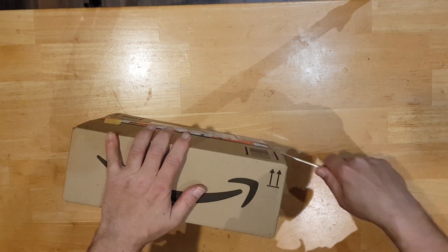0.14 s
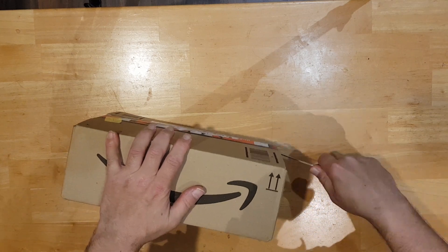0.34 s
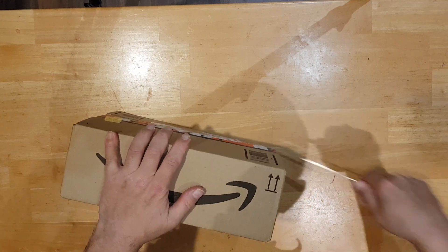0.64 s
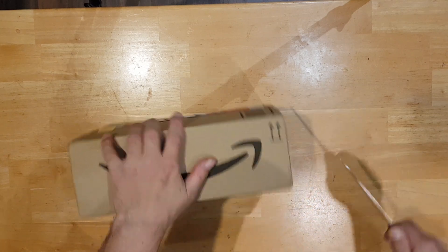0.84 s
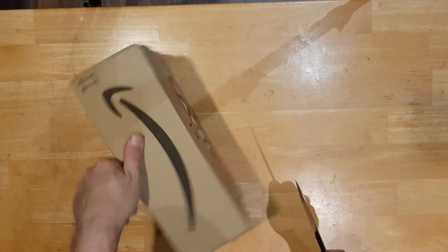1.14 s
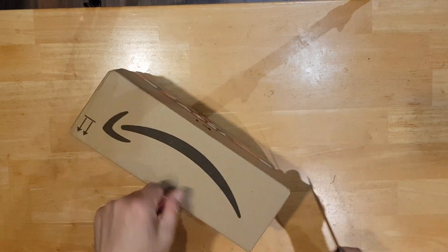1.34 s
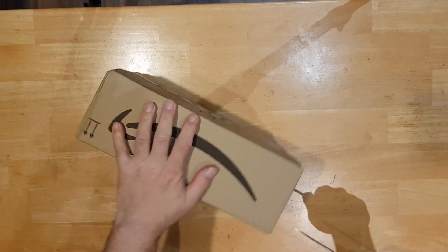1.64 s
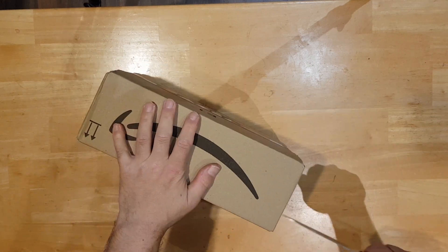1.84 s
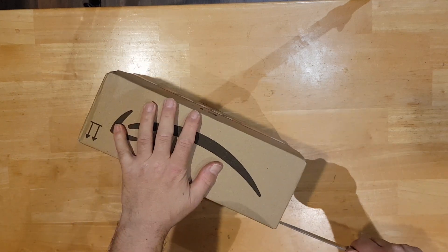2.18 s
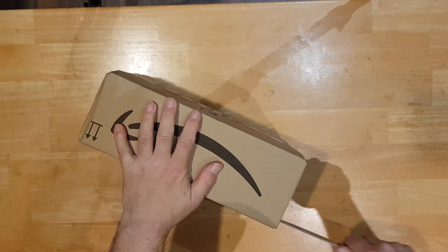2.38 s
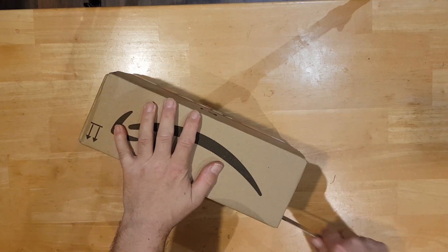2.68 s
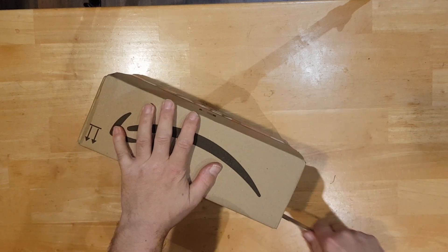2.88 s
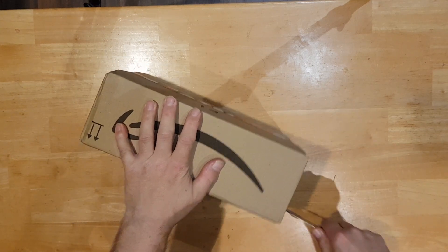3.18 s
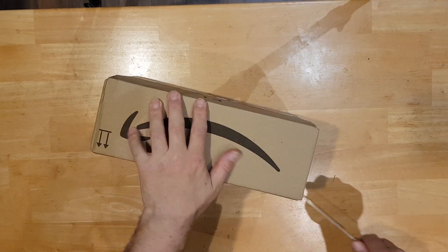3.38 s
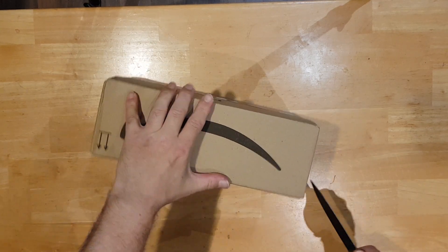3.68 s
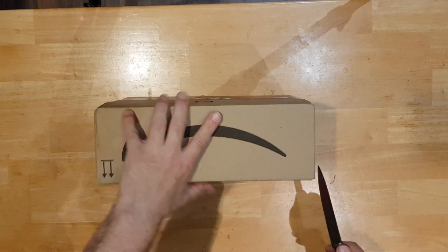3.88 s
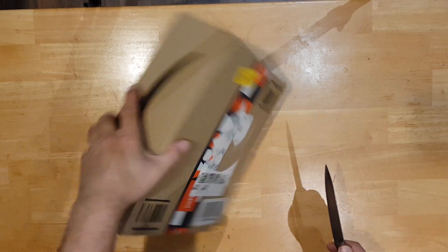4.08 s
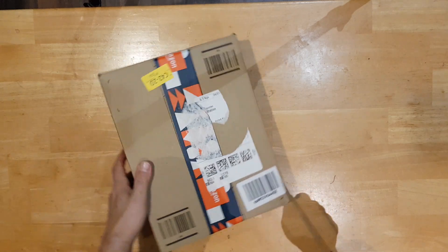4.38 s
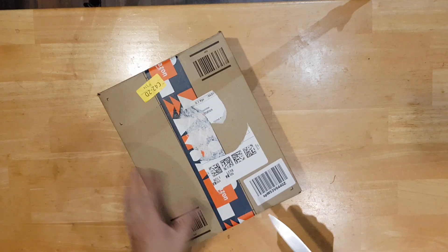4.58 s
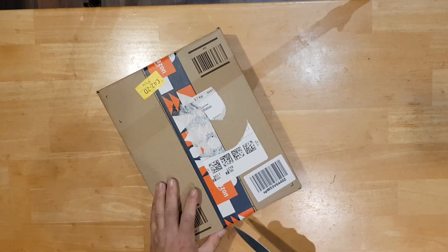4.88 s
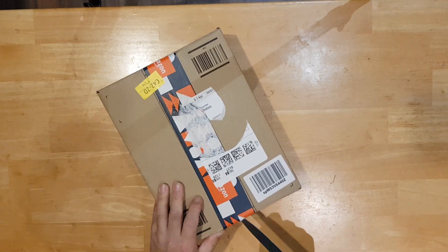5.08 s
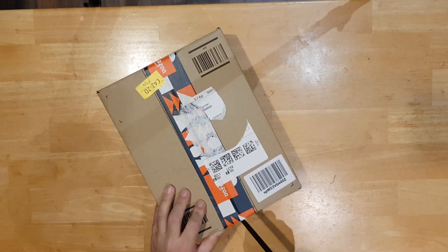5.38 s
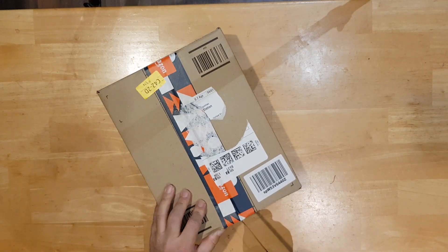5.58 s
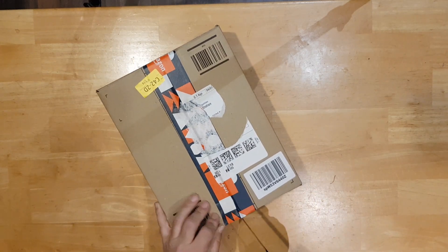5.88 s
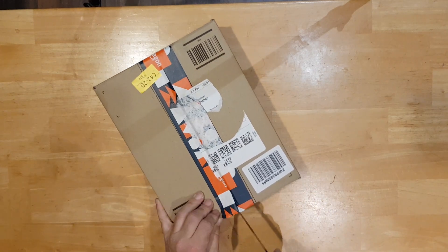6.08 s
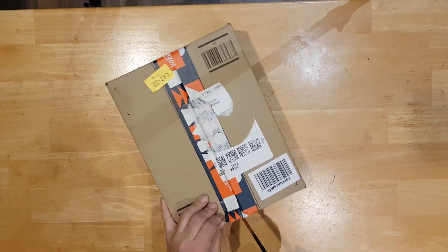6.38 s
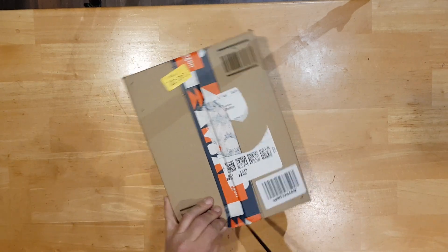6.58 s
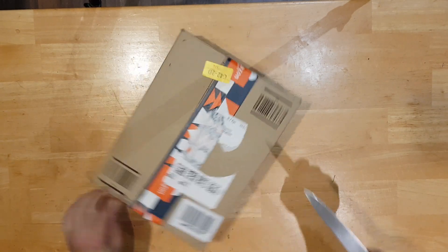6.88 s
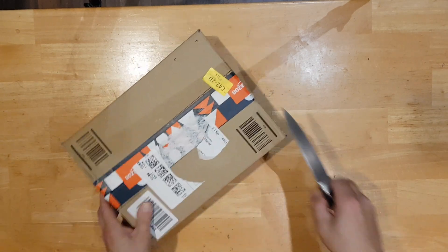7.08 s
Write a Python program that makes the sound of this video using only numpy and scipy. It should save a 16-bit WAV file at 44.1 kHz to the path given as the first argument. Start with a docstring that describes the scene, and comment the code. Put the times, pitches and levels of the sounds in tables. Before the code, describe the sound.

Recorded close in a small room with a short diffuse tail and faint steady air. At once a sharp rasping blade stroke shakes a cardboard box, a second comes near 0.35 s with a strong knock at 0.4 s. After light rubs, the box is spun on the wooden table from about 0.75 to 1.5 s, a swelling rough hiss with a low shudder, then ticks and a thump with tape cracks at 1.6 s. It is quiet until heavier rasping cuts at 2.5, 2.8 and 3.1 s with dull thuds, then weaker crackly strokes to 3.6 s. Sliding follows; a hollow knock at 4.2 s and a low thud at 4.55 s as the box turns over. From 4.8 to 6.6 s, soft short saw-like strokes carry many tape pops, densest around 5.6-6.1 s, with a tiny squeak near 5.4 s. Finally brushing slides, a thin squeak at 6.9 s and light double knocks near 7.1 s.

```python
"""A knife slits the tape of a cardboard box on a wooden table, close to a phone in a small room, and the
box is shoved and spun about. Blade strokes and slides are dense tiny slips that hiss and shake the panels.
Knocks and tape pops are filtered rings of the box, ticks are bright noise bursts, squeaks are wavering
tones. A diffuse room tail and steady faint air surround it all."""
import sys
import numpy as np
from scipy import signal
from scipy.fft import rfft, irfft
from scipy.io import wavfile
from scipy.ndimage import uniform_filter1d

SR = 44100
rng = np.random.default_rng(int(sys.argv[2]) if len(sys.argv) > 2 else 0)


def store_wav(level_fs):
    """Save 16-bit WAV to argv[1]."""
    pcm = np.round(np.clip(np.atleast_2d(level_fs), -1, 1) * 32767)
    wavfile.write(sys.argv[1], SR, pcm.T.astype(np.int16))


N = 319284
TIME = np.arange(N) / SR
RING = TIME[:SR // 2]  # time axis of one short sound, in seconds

# Spectrum of the room's steady air. Each row: frequency in Hz, relative level in dB.
AIR_COLOUR = [(18, -43), (30, -8.5), (185, -11.5), (267, -7), (415, -22), (581, -19.5), (905, -8),
              (1240, -23.5), (8250, -42), (15000, -20)]
# The room's decay. Each row: frequency in Hz, time to fall by 60 dB in seconds.
ROOM_DECAY = [(120, 0.33), (600, 0.27), (8000, 0.29)]
# The room's tail against the direct sound. Each row: frequency in Hz, level in dB.
ROOM_TAIL = [(120, -6), (500, -5.5), (1200, 0.5), (3500, -0.5)]
# Treble shading of the left port. Each row: frequency in Hz, gain in dB.
LEFT_SHADE = [(700, 0.5), (1300, -3), (2400, -2.5), (4400, -12), (8300, -31.5), (11500, -15.5)]
# What the box rings with. Each row: nominal frequency in Hz, typical level in dB, 60 dB decay in seconds.
BOX_MODES = [(88, -25, .12), (145, 0.5, 0.04), (171, -4, 0.13), (202, -2.5, 0.067), (270.4, 4, 0.076),
             (373, -2.5, 0.13), (395, 1, .05), (411.6, 2, 0.11), (494, 0.5, 0.027), (544.6, 0, .05),
             (680.5, -3.5, .045), (790, -0.5, 0.053), (1002, 5.5, 0.02), (1110, -16.5, 0.0089),
             (1680, -3.5, 0.037)]
# Spectrum of rubbing cardboard and tape. Each row: frequency in Hz, relative level in dB.
HISS_COLOUR = [(500, -19.5), (1200, -6), (1900, 3.5), (3000, -9), (4500, -1), (7700, 3), (9000, -8),
               (11000, 6), (16000, -1)]
# The sliding box shudders or the blade squeaks.
# Each row: start in seconds, nominal pitch in Hz, length in seconds, relative level in dB.
SQUEAKS = [(0.97, 155, 0.12, -36), (3.674, 2470, 0.015, -50.5), (3.68, 135, .06, -41.5),
           (4.573, 115, 0.072, -37), (5.36, 622.5, 0.11, -43), (6.857, 2930, .04, -41),
           (7.027, 990, 0.011, -39)]
# Sharp ticks of the blade tip, tape edge and box corners. Each row: start in seconds, energy in dB.
TICKS = [(0.388, -5.5), (1.331, -10), (1.36, -15), (1.62, -15), (2.082, -43), (4.316, -7), (4.642, -22),
         (5.436, -20.5), (5.952, -16), (6.498, -20.5), (6.637, -16.5), (7.099, -18)]
# The tape gives way under the blade or cracks as the box lands.
# Each row: start in seconds, energy of the snap in dB, pitch in Hz.
POPS = [(1.61, -14.5, 2400), (1.6205, -11.5, 2940), (3.391, -8.5, 594), (3.411, -8.5, 535),
        (3.454, -11, 890), (3.538, -16, 540), (4.543, -16, 2460), (5.048, -25.5, 447), (5.169, -19.5, 444),
        (5.284, -22, 810), (5.363, -13.5, 615), (5.550, -13.5, 670), (5.626, -14, 750), (5.658, -8, 794),
        (5.785, -15.5, 786), (5.798, -10.5, 790), (5.823, -10, 764), (5.946, -12, 940), (6.013, -7, 910),
        (6.052, -8, 905), (6.12, -12.5, 890), (6.26, -18, 537), (6.581, -18, 514)]
# The box is set down or jolted by the blade. Each row: start in seconds, energy of the thump in dB,
# relative hardness of the contact in dB, hollow knock over the thump in dB.
KNOCKS = [(0.094, -3, -7, -13), (0.39, 9, 6.5, -2.5), (1.609, -1, -4.5, -23.5), (1.6205, 5.5, -4.5, -35),
          (2.794, -5.5, 5, -13), (2.802, 3.5, -11, -30), (3.100, 5, 3, -20), (3.281, -8.5, -2.5, -23),
          (3.683, -15.5, -5, -36), (3.952, -12, 3.5, -24.5), (4.189, 4.5, 3.5, 7), (4.542, 6.5, -3.5, -12),
          (4.644, -13, -16, -28), (4.755, -22, -24, -28), (7.113, -9.5, -4, -11.5),
          (7.149, -6.5, -4.5, -10)]
# The hand shifts the box on the table, or the blade is drawn back lightly; the first row is a stroke
# already dying away. Each row: fastest moment in seconds, nominal length in seconds,
# relative hiss level in dB, weight on the contact (rumble setting over hiss setting) in dB.
SHOVES = [(0, 0.091, -49, -22), (0.257, 0.13, -47, -4), (0.591, 0.17, -66.5, 8.5), (0.68, 0.074, -63, 14),
          (1.697, 0.076, -47, 4.5), (2.107, 0.14, -72.5, -2.5), (2.478, 0.14, -56.5, -19),
          (3.807, .17, -46.5, 2), (4.011, .13, -44, 2), (4.318, 0.32, -53.5, 8.5), (4.549, 0.14, -51, -4),
          (6.723, 0.27, -53.5, 2.5), (6.887, 0.23, -47, -13.5), (7.047, 0.13, -53.5, -5),
          (7.215, 0.22, -50, 12)]
# The box is spun round on the table, as a curve. Each row: time in seconds, relative hiss level in dB,
# relative weight on the box in dB.
SPIN = [(0.74, -67, 12), (0.798, -52.5, -0.5), (0.918, -46, 14), (1.05, -37, -15), (1.146, -40, -21),
        (1.298, -48, 0), (1.366, -47.5, 4.5), (1.52, -113, 2)]
# Pushes of the blade along the tape.
# Each row: fastest moment in seconds, nominal length in seconds, relative hiss level in dB.
CUTS = [(0.086, 0.076, -36), (0.372, .12, -40), (2.554, .12, -43.5), (2.8, 0.13, -44.5),
        (2.951, 0.11, -61.5), (3.075, .15, -42.5), (3.28, 0.18, -53), (3.427, 0.19, -54),
        (3.56, 0.097, -57.5), (4.841, 0.17, -62), (5.074, 0.15, -62), (5.2, 0.12, -57),
        (5.319, 0.15, -56.5), (5.41, .08, -59), (5.564, 0.055, -52.5), (5.685, .1, -52), (5.832, 0.15, -52),
        (5.963, 0.038, -47), (6.041, .1, -48), (6.201, 0.16, -55.5), (6.31, 0.098, -52.5),
        (6.457, 0.17, -57.5), (6.606, 0.11, -51)]
# Rasp of the blade's edge along the tape, as a curve. Each row: time in seconds, relative level in dB.
RASP = [(5.7, -5), (6.3, 4), (6.9, -3.5)]

AIR_DB = -64.0  # rms, ahead of the phone's filters
RUN_UP_SHARE = 0.48  # part of a stroke spent speeding up
DRAG_DB, DRAG_S = -17.5, 0.089  # light contact around a stroke, and how long it lingers
TAPE_HZ, TAPE_WIDTH_HZ, TAPE_DB = 2820, 180, -9  # the taut tape rings within the rasp
TOP_HZ = 15950  # the phone's upper limit


def amp(db):
    """Decibels to gain."""
    return 10 ** (np.asarray(db) / 20)


def unit(x):
    """Scale to an energy of one."""
    return x / np.sqrt(np.sum(x ** 2) + 1e-18)


def at(hz, points):
    """Read (Hz, value) points on a log-frequency axis."""
    f, value = np.transpose(points)
    return np.interp(np.log(hz + 1e-9), np.log(f), value)


def colour(x, points):
    """Give a sound a smooth spectrum."""
    count = x.shape[-1]
    gain = amp(at(np.fft.rfftfreq(count, 1 / SR), points))
    return irfft(rfft(x) * gain, count)


def band(x, lo_hz, hi_hz, order=2):
    """Causal band-pass."""
    sos = signal.butter(order, [lo_hz, hi_hz], "band", fs=SR, output="sos")
    return signal.sosfilt(sos, x)


def fade(t60):
    """Exponential decay that falls by 60 dB in t60 seconds."""
    return np.exp(-np.log(1000) * RING / t60)


def burst(t60):
    """Noise that dies away, at an energy of one."""
    return unit(rng.standard_normal(len(RING)) * fade(t60))


def add(track, s, sound):
    """Mix a sound in at a time in seconds."""
    i = max(int(s * SR), 0)
    track[i:i + len(sound)] += sound[:N - i]


def room_tone():
    """Faint steady air: coloured noise, partly shared by the two ports."""
    air = rng.standard_normal(N) + 3.1 * rng.standard_normal((2, N))
    return amp(AIR_DB) * np.sqrt(2 * N) * unit(colour(air, AIR_COLOUR))


def room(x, alike_hz):
    """Direct sound plus a diffuse tail: each band's energy is stored and dies away; bass is alike in both ports."""
    edges = np.geomspace(45, 18000, 13)
    noise = rng.standard_normal((2, N))
    out = np.array([np.roll(x, shift=3), x])  # the left port hears it three samples later
    for lo, hi in zip(edges, edges[1:]):
        centre = np.sqrt(lo * hi)
        keep = np.exp(-2 * np.log(1000) / (at(centre, ROOM_DECAY) * SR))
        energy = band(x + 1e-18, lo, hi, order=3) ** 2
        stored = signal.lfilter([1 - keep], [1, -keep], energy)
        shifted = np.roll(noise, rng.integers(N), axis=1)
        mid, side = np.sqrt(2 * N) * unit(band(shifted, lo, hi, order=3))
        alike = np.clip(0.92 / (1 + (centre / alike_hz) ** 2), 0, 1)
        opposed = np.array([[1], [-1]]) * np.sqrt((1 - alike) / 2) * side
        echoes = np.sqrt((1 + alike) / 2) * mid + opposed
        out += amp(at(centre, ROOM_TAIL)) * np.sqrt(stored) * echoes
    return out


def box_ring(scatter_db, dent_db):
    """The box struck at a random spot: the board gives with one dead push, then its panels ring."""
    hz, db, t60 = np.transpose(BOX_MODES)[:, :, None]
    size, detune, side = rng.standard_normal((3, len(BOX_MODES), 1))
    t = RING[:SR // 8]
    level = np.sign(side + 0.48) * amp(db + scatter_db * size)
    decay = np.exp(-np.log(1000) * t / t60)
    modes = level * decay * np.sin(2 * np.pi * hz * (1 + 0.032 * detune) * t)
    ring = np.pad(modes.sum(axis=0), (0, len(RING) - len(t)))
    dent = band(signal.unit_impulse(len(RING)), 110, 2500, order=1)
    return unit(ring) + amp(dent_db) * unit(dent)


def squeaks():
    """For a moment the slips fall into step and make a rough tone: a wavering sine and its octave."""
    out = np.zeros(N)
    for s, hz, length, db in SQUEAKS:
        t = RING[RING < length]
        waver = uniform_filter1d(rng.standard_normal(len(t)), size=60)
        phase = 2 * np.pi * np.cumsum(hz * (1 + 0.84 * waver)) / SR
        tone = np.sin(phase) + amp(-9) * np.sin(2 * phase)
        add(out, s, amp(db + 0.5) * np.sin(np.pi * t / length) * tone)
    return out


def ticks():
    """Short bright scuffs of noise that leave the box still."""
    out = np.zeros(N)
    for s, db in TICKS:
        add(out, s, amp(db) * unit(band(burst(0.061), 1800, 16200, order=1)))
    return out


def pops():
    """The tape snaps: a few dead cycles at the spot, and the box answers with a soft thud."""
    out = np.zeros(N)
    for s, db, hz in POPS:
        ring = box_ring(scatter_db=-1.0, dent_db=-3.0)
        snap = unit(band(ring, 0.64 * hz, 1.82 * hz))
        thud = amp(-8) * unit(band(ring, 47, 138))
        add(out, s, amp(db) * (snap + thud))
    return out


def knocks():
    """A knock thumps the panels and sounds the hollow; harder contact adds clacking flaps and edge crunch."""
    out = np.zeros(N)
    for s, db, hard_db, hollow_db in KNOCKS:
        ring = box_ring(scatter_db=2.5, dent_db=-3)
        thump = unit(band(ring, 60, 292, order=3))
        hollow = amp(hollow_db) * unit(band(ring, 400, 667, order=3))
        clack = amp(-8.0) * unit(band(ring, 700, 1300))
        crunch = amp(-16) * unit(colour(rng.standard_normal(len(RING)), HISS_COLOUR) * fade(0.07))
        # neighbouring parts swing against each other, hence the minus
        add(out, s, amp(db) * (thump - hollow + amp(hard_db) * (clack + crunch)))
    return out


def slips(count, per_s, spread_db):
    """Random tiny slips of either sign, a few much larger than the rest; rms one."""
    size = amp(spread_db * np.minimum(rng.exponential(size=count), 4))
    sign = rng.choice([-1, 1], count)
    happens = rng.random(count) < per_s / SR
    return np.sqrt(count) * unit(size * sign * happens)


def stroke(s, length):
    """A stroke speeds up, slows down and drags on lightly: its start time and its speed, one at the fastest."""
    start = max(s - length, 0)
    t = start + RING - s
    reach = length * np.where(t < 0, RUN_UP_SHARE, 1 - RUN_UP_SHARE)
    push = np.exp(-1.8 * np.abs(t / reach) ** 2.07)
    drag = amp(DRAG_DB) * np.exp(-np.abs(t) / DRAG_S)
    return start, np.maximum(push, drag)


def rub(speed, hiss_db, scrape_db, rumble_db, rasp_db, low_hz, grit_db):
    """Fine slips hiss and rasp at the contact; the coarser ones shake flaps and panels."""
    count = len(speed)
    # the corrugation makes the contact uneven
    bumps = np.sqrt(count) * unit(band(rng.standard_normal(count), 23, 83, order=1))
    speed = speed * amp(1.56 * bumps)
    fine = slips(count, per_s=7500, spread_db=grit_db)
    tape = unit(band(fine, TAPE_HZ - TAPE_WIDTH_HZ / 2, TAPE_HZ + TAPE_WIDTH_HZ / 2, order=1))
    edge = unit(band(fine, 2000, 3800, order=1))
    rasp = amp(rasp_db - 6) * (edge + amp(TAPE_DB) * tape)
    hiss = np.sqrt(count) * (unit(colour(fine, HISS_COLOUR)) + rasp) * speed
    # a lighter stroke catches less often and so crackles more
    catches_per_s = 1100 * amp(0.26 * (np.max(hiss_db) + 45))
    coarse = slips(count, per_s=catches_per_s, spread_db=3.5) * speed
    ring = box_ring(scatter_db=3.5, dent_db=-0.5)
    flaps = signal.fftconvolve(amp(scrape_db) * coarse, unit(band(ring, 250, 1100)))
    panels = signal.fftconvolve(amp(rumble_db) * coarse, unit(band(ring, low_hz, 352)))
    return amp(hiss_db + 3.5) * hiss + (flaps + panels)[:count]


def sliding():
    """Short shoves or light draws of the blade, and one long spin; more weight shakes panels and flaps more."""
    out = np.zeros(N)
    for s, length, db, weight_db in SHOVES:
        start, speed = stroke(s, length)
        rasp_db = np.interp(s, *np.transpose(RASP))
        add(out, start, rub(speed, db, scrape_db=db + 2.5 + 0.47 * weight_db, rumble_db=db + weight_db,
                            rasp_db=rasp_db, low_hz=100, grit_db=2.0))
    s, db, weight_db = np.transpose(SPIN)
    t = TIME[(TIME >= s[0]) & (TIME < s[-1])]
    db, weight_db = np.interp(t, s, db), np.interp(t, s, weight_db)
    add(out, s[0], rub(np.ones(len(t)), db, scrape_db=db + 1.3 + 0.4 * weight_db,
                       rumble_db=db + weight_db - 8.5, rasp_db=-9.5, low_hz=150, grit_db=0.5))
    return out


def cutting():
    """The blade is pushed along the tape; a harder push lifts the panels' rumble more than the flaps' scrape."""
    out = np.zeros(N)
    for s, length, db in CUTS:
        start, speed = stroke(s, length)
        rasp_db = np.interp(s, *np.transpose(RASP))
        add(out, start, rub(speed, db, scrape_db=db + 5, rumble_db=-42.5 + 1.13 * (db + 50),
                            rasp_db=rasp_db, low_hz=85, grit_db=5))
    return out


def scene():
    """All handling sounds in the room, brighter at the right port, over the room's air."""
    handling = squeaks() + ticks() + pops() + knocks() + sliding() + cutting()
    left, right = room(handling, alike_hz=620)
    return np.array([colour(left, LEFT_SHADE), right]) + room_tone()


def record(dry):
    """The phone thins the deep bass and cuts the top."""
    thin = signal.sosfilt(signal.butter(2, 42, "high", fs=SR, output="sos"), dry)
    return signal.sosfilt(signal.ellip(10, 0.2, 80, TOP_HZ, fs=SR, output="sos"), thin)


dry = scene()
out = record(dry)
store_wav(out)
```